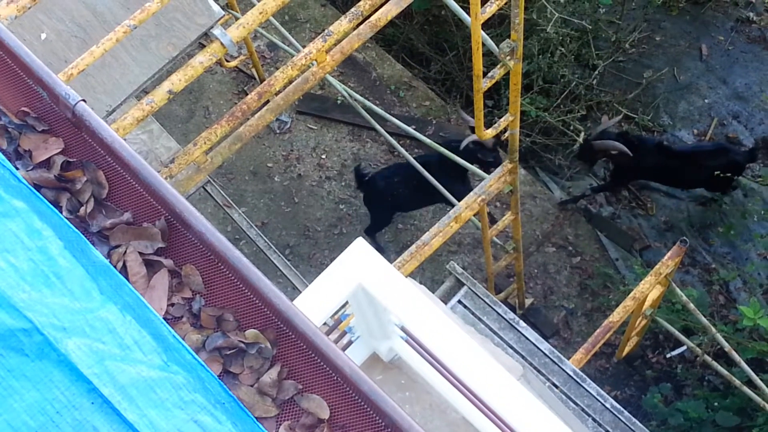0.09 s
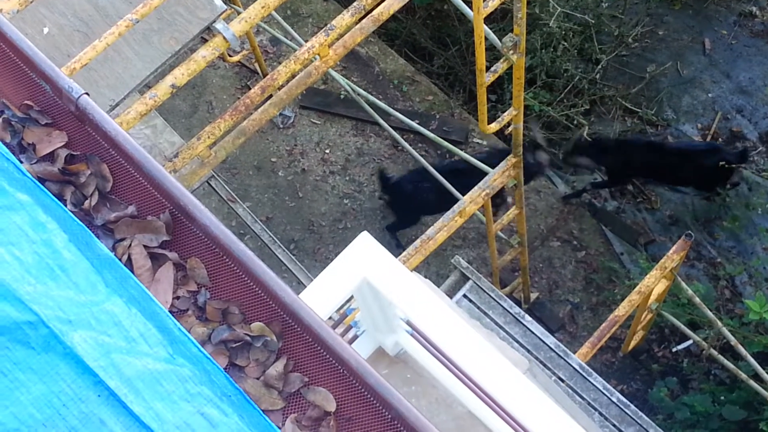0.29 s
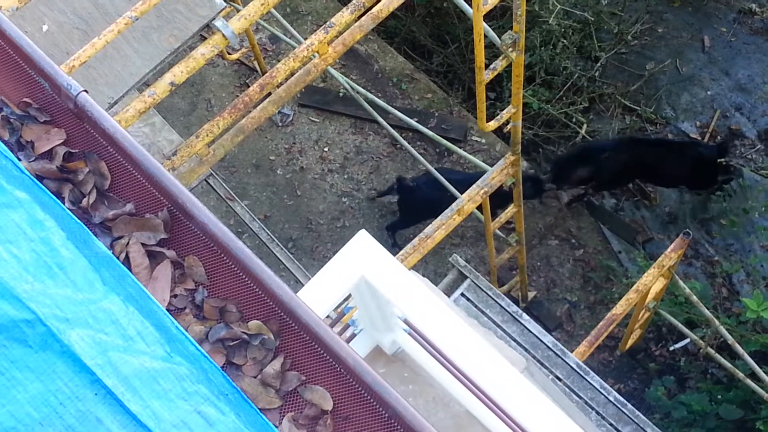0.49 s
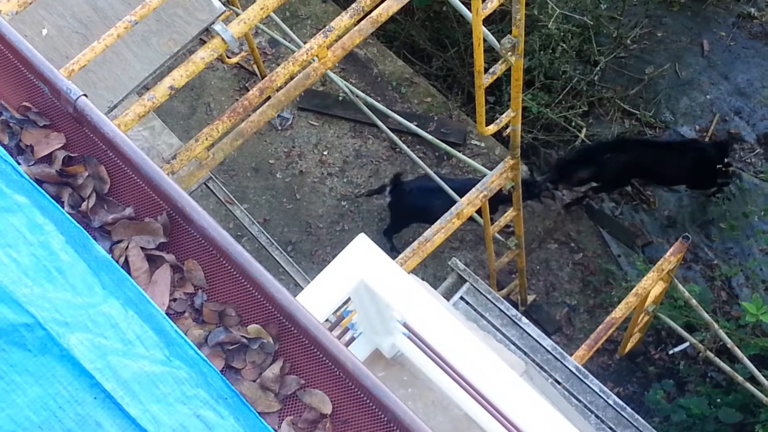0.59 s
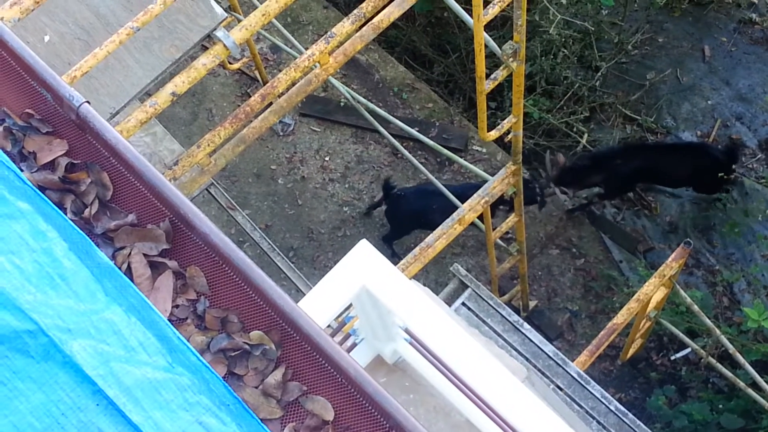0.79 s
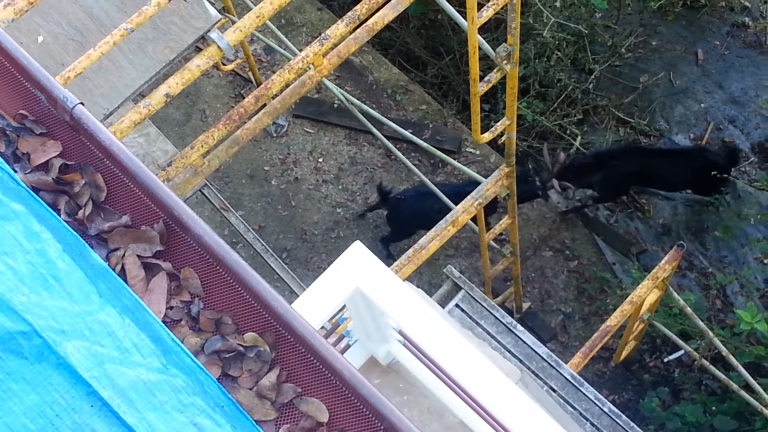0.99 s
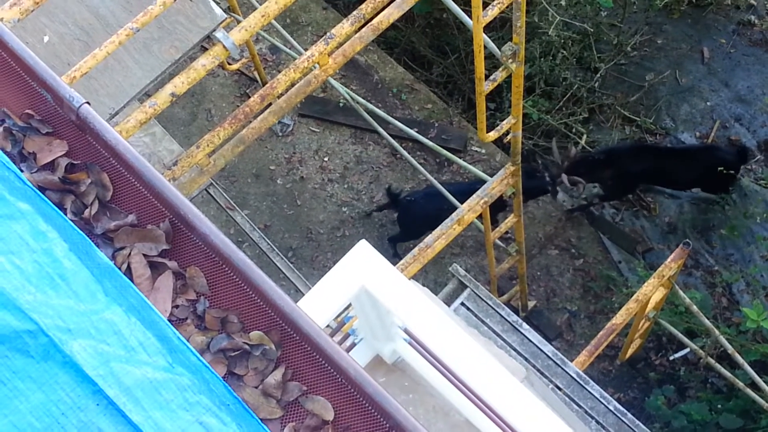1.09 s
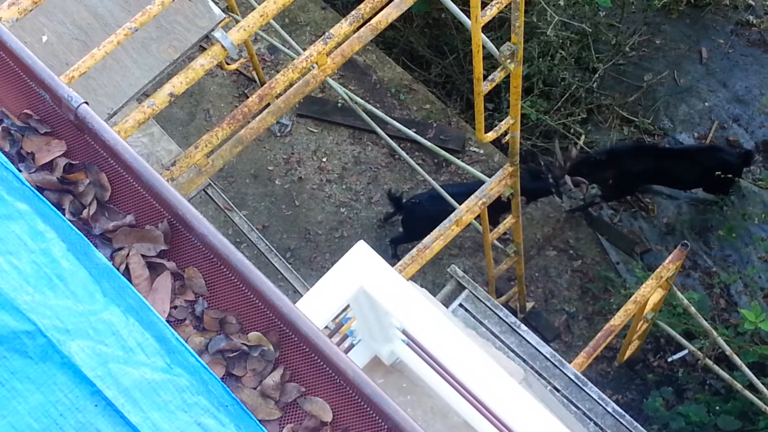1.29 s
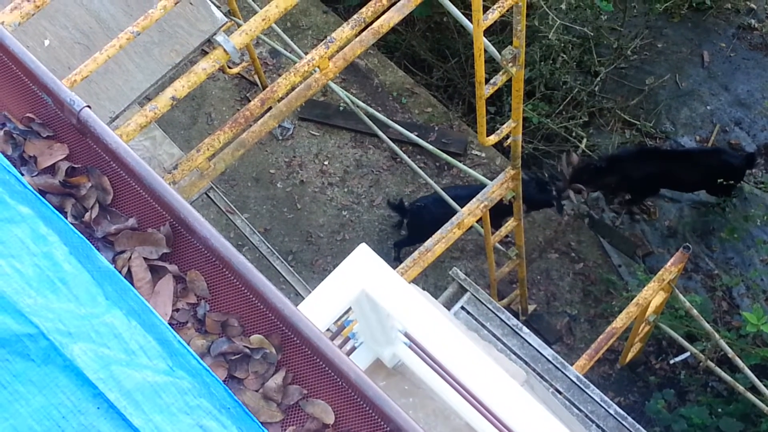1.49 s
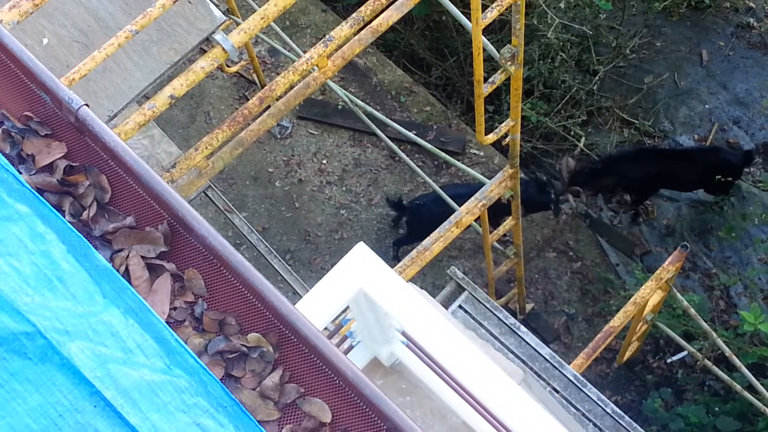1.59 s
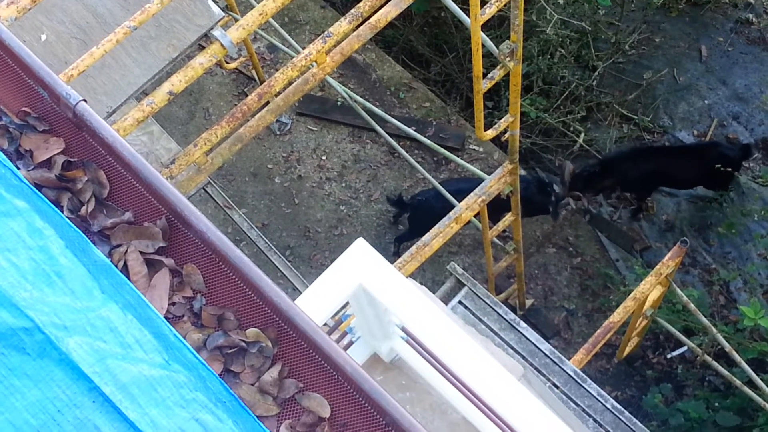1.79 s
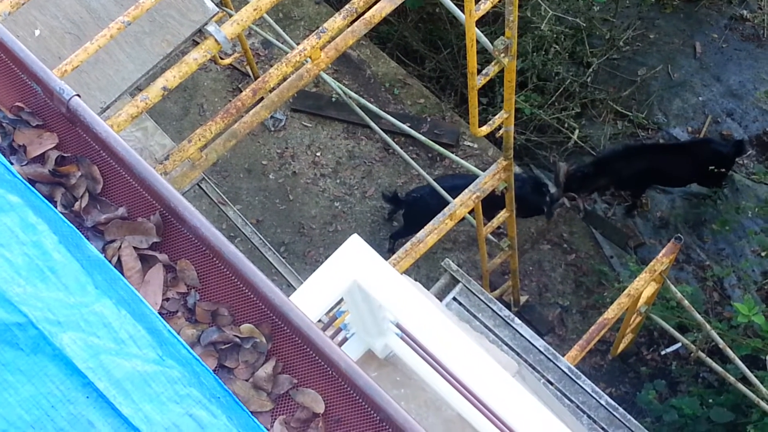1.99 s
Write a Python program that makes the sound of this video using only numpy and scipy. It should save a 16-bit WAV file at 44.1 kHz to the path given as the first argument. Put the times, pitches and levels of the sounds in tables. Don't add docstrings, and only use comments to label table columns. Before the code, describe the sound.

Two goats butt heads with one loud, clattering horn knock and a dull thump, dry leaves crackling underfoot; a distant bird trills beforehand, a nearer one chips twice afterward, in a walled yard heard from above.

```python
import sys
import numpy as np
from scipy import signal
from scipy.io import wavfile

SR = 44100
rng = np.random.default_rng(int(sys.argv[2]) if len(sys.argv) > 2 else 0)


def wav_out(sig):
    wavfile.write(sys.argv[1], SR, np.round(np.clip(np.atleast_2d(sig).T, -1, 1) * 32767).astype(np.int16))


def convert_level_to_amplitude(level_db):
    exponent = np.asarray(level_db, float) / 20
    return 10 ** exponent


N = 88200

# f/Hz, level/dB, t60/s
HORN_MODES = [(604.8, -31.5, 0.088), (1001, -19.5, .022), (1680, 2, 0.025), (2343, -6, 0.02),
              (2710, -10.5, 0.018)]
CLASH_S, CLASH_DB, CLASH_PAN_DB = .4447, -10.5, -1
# t/s, body level/dB, body f/Hz, crack level/dB, pan left minus right/dB
KNOCKS = [(.169, -36, 2000, -60.5, 0), (.412, -44.5, 1150, -72.5, 3.5), (.4448, -27.5, 1700, -10, -4),
          (.4459, -15, 1698, -24.5, 0.5), (.4476, -9, 2350, -14, 1.5), (.4505, -19.5, 1100, -29, -1),
          (0.454, -15.5, 1700, -31, -2.5), (.4561, -15, 1300, -29.5, -2), (.4578, -17.5, 2500, -28, 0),
          (0.4645, -14.5, 1200, -32, -2.5), (.4678, -19, 1600, -29.5, 2), (0.4708, -18.5, 2600, -23, -1),
          (0.472, -22.5, 2200, -29, -0.5), (0.482, -17.5, 1950, -25.5, 0), (0.4856, -14.5, 1900, -24, 0),
          (.487, -25, 900, -25.5, 0), (0.4932, -21, 1100, -31.5, 0), (0.4983, -40.5, 700, -20.5, 2),
          (.5022, -20, 1000, -31.5, 1), (0.5034, -18, 1900, -29.5, 1.5), (.5068, -22.5, 900, -27, 2),
          (.513, -30, 1500, -18.5, 1), (0.5203, -27, 2300, -23, -3), (0.53, -33, 1500, -27, -1),
          (0.5507, -19.5, 2600, -16.5, 0), (.552, -24.5, 1300, -23, 1), (.589, -46, 2000, -32.5, 8),
          (0.711, -46, 2000, -46, 1.5)]
TICKS = [(1.355, -53, 2810, -48, 2.5), (1.358, -64, 2716, -45, 2), (1.44, -68, 2400, -42, 2),
         (1.376, -43, 2225, -42, 0), (1.3842, -47, 3200, -36, -8), (1.3902, -32.5, 1680, -32.5, 5),
         (1.3914, -36.5, 2408, -50, 3), (1.3937, -34, 2300, -35, -5), (1.424, -65, 2000, -46, -6.5),
         (1.453, -73, 3530, -43.5, -13),
         (1.599, -68, 1450, -80, 2), (1.644, -69, 1700, -75, 1), (1.653, -69, 1200, -75, 0),
               (1.692, -62, 1450, -76, 2.5), (1.744, -62, 2800, -70, 0), (1.859, -65, 1400, -75, 0)]
# share of body f, level/dB
BODY_MODES = [(.6, -15.5), (1.0, 2.5), (1.5, -4)]
# f/Hz, level/dB, t60/s
CRACK_MODES = [(4710, -7, 0.0083), (6500, 1.5, 0.0028), (7660, -5, 0.0073), (10410, -4.5, 0.0033),
               (13000, -1.5, 0.001)]
BODY_DB, CRACK_DB = -1.5, -2
CONTACT_S, BODY_CYCLES, BODY_GRIT = 0.00061, 7.5, .25

# t/s, level/dB, t60/s
THUMPS = [
    (0.051, -50, 0.035),
    (0.271, -54.5, 0.52),
    (0.452, -21.5, .1),
    (.49, -26, 0.22),
    (.52, -27, 0.1),
    (.75, -62, .1),
    (1.367, -44, 0.14),
    (1.701, -46, 0.045),
    (1.891, -49.5, 0.084),
]
# f/Hz, level/dB, share of the thump's t60
GROUND_MODES = [(81, 4, 0.97), (106, -1, 0.49), (234, -6.5, 0.73), (370, -6, 0.36), (563, -1.5, 0.3),
                (760, -6.5, 0.5)]
# t/s, f/Hz, level/dB, t60/s
HOLLOW_TAP = (1.422, 730, -66, .06)

# t/s, rise/s, hold/s, level/dB, fall/dB per s
STIRS = [(-.05, 0.0065, 0.017, -54.5, 16), (.34, 0.014, 0.17, -65.5, 298), (0.4455, 0.002, 0.068, -36, 330),
         (0.543, 0.0015, 0.0054, -38.5, 196), (0.589, 0.025, 0.011, -60, 359),
         (0.708, 0.022, 0.0097, -54, 200), (0.79, 0.026, 0.03, -66, 501), (0.871, 0.027, 0.099, -62, 304),
         (1.347, 0.0062, 0.0066, -65.5, 403), (1.367, 0.013, 0.021, -54, 238),
         (1.432, 0.0094, 0.0048, -69, 610.5), (1.568, 0.062, 0.037, -77.5, 300),
         (1.664, 0.013, 0.11, -63, 344.5), (1.87, 0.016, 0.014, -67.5, 495)]
# f/Hz, level/dB per Hz
LEAF_SPECTRUM = [(180, -44.5), (300, -7), (731, -12), (892, -10.5), (1330, -8), (2830, -8), (8140, -2.5),
                 (14000, -12), (15500, -36)]
LEAF_DB, CRACKLE_DB, CRACKLES_PER_S, CRACKLE_SPREAD_DB, CRACKLE_CYCLES = 4.0, -7.0, 2200, 2.6, 4.0
# t/s, length/s, f/Hz, level/dB
SQUEAKS = [(.258, .012, 8800, -47.5), (.36, .022, 8800, -48), (.482, .007, 7900, -30.5),
           (.511, .027, 7750, -32.5), (0.587, .01, 7500, -42), (0.712, .005, 8200, -45),
           (0.832, .01, 7800, -56)]

# t/s, length/s, level/dB, lowest f/Hz, second voice level/dB
CHIPS = [
    (0.896, .025, -31.5, 8610, -39.5),
    (1.69, 0.0165, -32.5, 8603, -48.5),
]
CHIP_FALL_HZ, CHIP_RISE_HZ, CHIP_PAN_DB = 1480, 1100, 3
CHIP_TURN = .38
RASP_HZ, RASP_DB = 9900, -15
UPPER_DELAY_S, UPPER_S, UPPER_HZ, UPPER_ARCH_HZ = .011, .015, 12000, 1250

# t/s, level/dB
TRILL_LEVEL = [(0, -47.5), (.1, -47), (.165, -46.5), (.25, -53.5), (.265, -38.5), (.35, -46), (.38, -38),
               (.44, -46), (.5, -44), (.52, -42), (.54, -47)]
# t/s, share of the full drop
TRILL_REACH = [(0, 1.01), (.15, 0.77), (.2, 0.69), (.3, 0.64), (.44, 0.7), (.5, .5)]
TRILL_PER_S, TRILL_TOP_HZ, TRILL_DROP_HZ, TRILL_DB, TRILL_PAN_DB = 80, 9120, 4030, 5, 4
# t/s, length/s, start f/Hz, end f/Hz, level/dB
SLIDES = [
    (.161, .1, 8600, 7700, -49),
    (.17, .092, 8200, 7000, -47),
]
SLIDE_SWELL_DB_PER_S = 70

# f/Hz, level/dB per Hz
AIR_SPECTRUM = [(15, -66), (25, -41.5), (101, -7.5), (126, -8), (410, -14.5), (445, -14), (1240, -28),
                (10600, -33), (15500, -45)]
AIR_DB, INSECT_HZ, INSECT_DB = -72.5, 10239, -85
BUSY_DB, CALM_AT_S = 5, 1.07
# f/Hz, correlation
LIKENESS = [(60, 0.54), (240, 0.6), (950, 0.17), (3770, 0.2), (15000, 0.047)]

YARD_T60_S, YARD_GAP_S = 0.2, 0.0016
KNOCK_ECHO_DB, CHIP_ECHO_DB, TRILL_ECHO_DB = -13, -1.5, 0.5
NOTCH_HZ, NOTCH_WIDTH_HZ, NOTCH_DEPTH = 3548, 800, 0.45
CUTOFF_HZ = 14850


def rms_one(x):
    return x / np.sqrt(np.mean(x ** 2) + 1e-20)


def in_time(rows):
    return np.interp(np.arange(N) / SR, *np.transpose(rows))


def at_hz(points, hz):
    table_hz, values = np.array(points)[:, 0], np.array(points)[:, 1]
    return np.interp(np.log(hz), np.log(table_hz), values)


def drift(rate):
    r = np.exp(-80 * np.pi * rate / SR)
    chance = rng.standard_normal(N // 40 + 2002)
    slow = signal.lfilter([1], [1, -2 * r, r * r], chance)[2000:]
    return np.interp(np.arange(N) / 40, np.arange(len(slow)), rms_one(slow))


def cut_low(x, hz):
    return signal.sosfilt(signal.butter(2, hz, "high", fs=SR, output="sos"), x)


def ring(clicks, hz, t60):
    r = convert_level_to_amplitude(-60 / (t60 * SR))
    w = 2 * np.pi * min(hz, .45 * SR) / SR
    return signal.lfilter([0, np.sin(w)], [1, -2 * r * np.cos(w), r * r], clicks + 1e-18)


def note(start, length, hz, db, swell=1.1):
    u = np.clip((np.arange(N) / SR - start) / length, 0, 1)
    swelling = np.abs(np.sin(np.pi * u)) ** swell
    return np.sqrt(2) * convert_level_to_amplitude(db) * swelling * np.sin(2 * np.pi * np.cumsum(hz(u)) / SR)


def pan(db):
    return convert_level_to_amplitude(np.array([[db / 2], [-db / 2]]))


def banded_noise(spectrum, patchy_db):
    out, edges = 0, 25 * 2 ** np.arange(0, 9.6, .5)
    white = rng.standard_normal((2, 2, N))
    for k, (low, high) in enumerate(zip(edges, edges[1:])):
        band = signal.butter(2, [low, high], "band", fs=SR, output="sos")
        mid, side = signal.sosfilt(band, white[k % 2])
        hz = np.sqrt(low * high)
        alike = np.clip(at_hz(LIKENESS, hz), -1, 1)
        gain = convert_level_to_amplitude(at_hz(spectrum, hz) + patchy_db * drift(55))
        out = out + gain * (np.sqrt(1 + alike) * mid + np.sqrt(1 - alike) * side * [[1], [-1]])
    return rms_one(out)


def yard(x, db, t60):
    t = np.arange(SR // 2) / SR
    uneven = 2.6 * rng.standard_normal((2, len(t)))
    echoes = rng.standard_normal((2, len(t))) * convert_level_to_amplitude(uneven - 60 * t / t60) * (t > YARD_GAP_S)
    echoes = echoes / np.sqrt(np.sum(echoes ** 2, axis=1, keepdims=True))
    return convert_level_to_amplitude(db) * signal.fftconvolve(x * np.ones((2, 1)), echoes, axes=1)[:, :N]


def contact(t, fade, db, body_hz, bright_db):
    push = np.sin(np.pi * np.clip(t * 3 * body_hz, 0, 1)) * 5 * body_hz / SR
    scrape = rng.standard_normal(len(t)) + .6 * rng.standard_normal((2, len(t)))
    push = push + BODY_GRIT * fade * scrape / 4
    body, crack = 0, 0
    for share, part_db in BODY_MODES:
        body = body + convert_level_to_amplitude(db + BODY_DB + part_db) * ring(push, body_hz * share, BODY_CYCLES / body_hz)
    for hz, mode_db, t60 in CRACK_MODES:
        grit = fade * rng.standard_normal((2, len(t)))
        strength = np.abs(grit @ np.exp(2j * np.pi * hz * t))
        grit = grit / np.maximum(strength, 1)[:, None]
        level = convert_level_to_amplitude(bright_db + CRACK_DB + mode_db + 2.5 * rng.standard_normal())
        crack = crack + level * cut_low(ring(grit, hz, t60), .5 * hz)
    return cut_low(body, 0.37 * body_hz) + crack


def knocks():
    out, t = np.zeros((2, N + SR)), np.arange(1500) / SR
    fade = np.exp(-t / CONTACT_S) + (t == 0)
    horns = sum(convert_level_to_amplitude(db) * ring(1. * (t == 0), hz, t60) for hz, db, t60 in HORN_MODES)
    out[:, int(CLASH_S * SR):][:, :len(t)] += convert_level_to_amplitude(CLASH_DB) * pan(CLASH_PAN_DB) * horns
    for s, db, body_hz, bright_db, pan_db in KNOCKS + TICKS:
        hit = contact(t, fade, db, body_hz, bright_db)
        out[:, int(s * SR):][:, :len(t)] += pan(pan_db) * hit
    return out[:, :N]


def thumps():
    t, out = np.arange(N) / SR, np.zeros((2, N))
    for s, db, t60 in THUMPS:
        shove = rng.standard_normal(N) + .3 * rng.standard_normal((2, N))
        shove = shove * np.clip((t - s) / .008, 0, 1) * np.exp(-np.abs(t - s) / 0.014) * 0.03
        for hz, mode_db, share in GROUND_MODES:
            out += convert_level_to_amplitude(db + mode_db) * cut_low(ring(shove, hz, t60 * share), 0.55 * hz)
    s, hz, db, t60 = HOLLOW_TAP
    tap = note(s, 0.017, lambda u: hz + 40 * drift(62), -37.5)
    return cut_low(out, 100) + convert_level_to_amplitude(db) * ring(tap, hz, t60)


def leaves():
    t, stir, crackle = np.arange(N) / SR, 0, 0
    for s, rise, hold, db, fall in STIRS:
        dying_db = fall * np.maximum(t - s - rise - hold, 0)
        stir = stir + np.clip((t - s) / rise, 0, 1) ** 2 * convert_level_to_amplitude(db - dying_db)
    sizes_db = CRACKLE_SPREAD_DB * np.minimum(rng.exponential(1, (2, N)), 5)
    sizes = convert_level_to_amplitude(sizes_db) * rng.choice([-1, 1], (2, N))
    born = rng.random(N) < CRACKLES_PER_S * convert_level_to_amplitude(3 * drift(20)) / SR
    snaps = (sizes[0] + 0.46 * sizes[1] * [[1], [-1]]) * born
    dealt = rng.integers(0, 16, N)
    for k, hz in enumerate(np.geomspace(900, 14000, 16)):
        rung = ring(snaps * (dealt == k), hz, CRACKLE_CYCLES / hz)
        crackle = crackle + convert_level_to_amplitude(at_hz(LEAF_SPECTRUM, hz)) * hz * cut_low(rung, hz / 2)
    hiss = banded_noise(LEAF_SPECTRUM, patchy_db=1.0)
    return stir * convert_level_to_amplitude(LEAF_DB) * (hiss + convert_level_to_amplitude(CRACKLE_DB) * rms_one(crackle))


def squeaks():
    wobble, flutter = 300 * drift(150), convert_level_to_amplitude(4 * drift(200))
    tones = sum(note(s, length, lambda u: hz + wobble, db, swell=1.0) for s, length, hz, db in SQUEAKS)
    direct = flutter * tones
    return direct + yard(direct, -9, t60=.1)


def near_bird():
    call, upper, wobble = np.zeros(N), np.zeros(N), drift(220)
    for s, length, db, low_hz, upper_db in CHIPS:
        def dip(u):
            fall = CHIP_FALL_HZ * (1 - u / CHIP_TURN) ** 2
            climb = CHIP_RISE_HZ * np.abs((u - CHIP_TURN) / (1 - CHIP_TURN)) ** 0.97
            return low_hz + 90 * wobble + np.where(u < CHIP_TURN, fall, climb)

        def arch(u):
            return UPPER_HZ + 170 * wobble + UPPER_ARCH_HZ * np.sin(2.5 * u ** .6)

        call += note(s, length, dip, db, swell=0.6) * convert_level_to_amplitude(2.05 * drift(130))
        call += note(s - .004, length + 0.0028, lambda u: RASP_HZ + 600 * drift(190), db + RASP_DB, swell=0.62)
        upper += note(s + UPPER_DELAY_S, UPPER_S, arch, upper_db, swell=.7) * convert_level_to_amplitude(4 * drift(300))
    echoes = yard(call, CHIP_ECHO_DB, t60=0.29) + yard(upper, CHIP_ECHO_DB, t60=.15)
    return pan(CHIP_PAN_DB) * (call + upper) + echoes


def far_bird():
    t = np.arange(N) / SR
    u = (TRILL_PER_S * t + .12 * drift(15)) % 1
    hz = TRILL_TOP_HZ - TRILL_DROP_HZ * in_time(TRILL_REACH) * u + 300 * drift(60)
    effort = convert_level_to_amplitude(in_time(TRILL_LEVEL) + TRILL_DB) * (t < .54)
    trill = np.sin(np.pi * u) ** 0.47 * np.sin(2 * np.pi * np.cumsum(hz) / SR) * effort
    swelling = convert_level_to_amplitude(3.5 * drift(120) + SLIDE_SWELL_DB_PER_S * (np.clip(t, .16, .26) - .22))
    slides = 0
    for s, length, a, b, db in SLIDES:
        slides = slides + note(s, length, lambda u: a + (b - a) * u ** 2.2, db, swell=.2)
    slides = swelling * slides
    direct = convert_level_to_amplitude(-16 + 25 * np.minimum(t, .26) + 4 * drift(60)) * trill + slides
    echoes = yard(trill, TRILL_ECHO_DB, t60=.3) + yard(slides, 4.5, t60=.14)
    return pan(TRILL_PAN_DB) * (direct + echoes)


def air():
    insect_hz = INSECT_HZ + 15 * drift(20)
    insect = convert_level_to_amplitude(INSECT_DB + 1.2 * drift(9.1)) * np.sin(2 * np.pi * np.cumsum(insect_hz) / SR)
    busy = np.clip((CALM_AT_S - np.arange(N) / SR) / 0.041, 0, 1)
    return convert_level_to_amplitude(AIR_DB + BUSY_DB * busy) * banded_noise(AIR_SPECTRUM, patchy_db=-1.0) + insect


def scene():
    blows = knocks()
    goats = blows + yard(blows.mean(axis=0), KNOCK_ECHO_DB, YARD_T60_S) + thumps() + leaves() + squeaks()
    return goats + near_bird() + far_bird() + air()


def band_limit(x):
    return signal.sosfilt(signal.butter(12, 15850, fs=SR, output="sos"), x)


def record(dry):
    peak = signal.iirpeak(NOTCH_HZ, NOTCH_HZ / NOTCH_WIDTH_HZ, fs=SR)
    heard = cut_low(dry - NOTCH_DEPTH * signal.lfilter(*peak, dry), 42)
    rounded = 0.93 * np.tanh(heard / 0.81)
    top_cut = signal.cheby2(14, 30, CUTOFF_HZ, fs=SR, output="sos")
    return band_limit(signal.sosfilt(top_cut, rounded))


dry = scene()
out = record(dry)
wav_out(out)
```